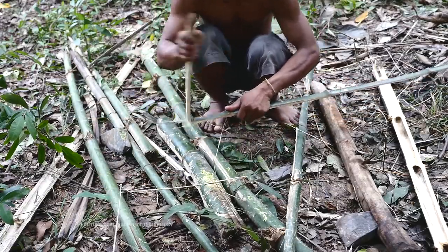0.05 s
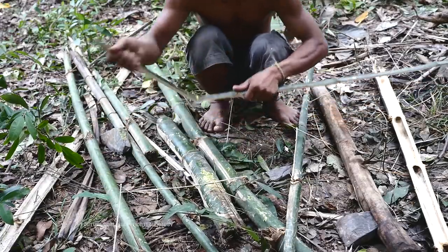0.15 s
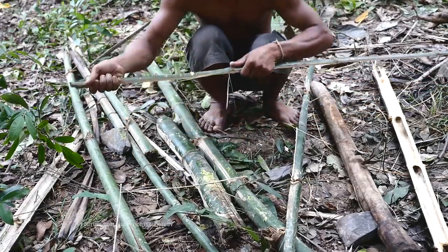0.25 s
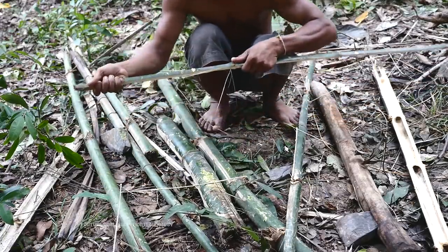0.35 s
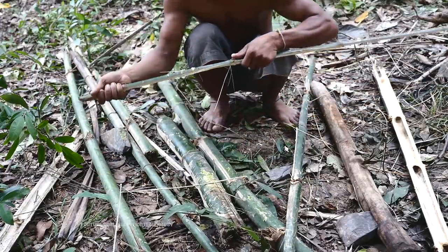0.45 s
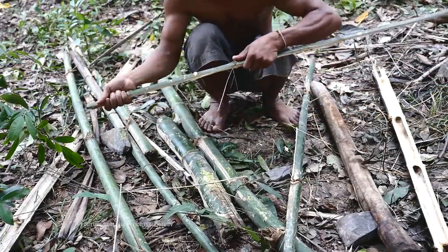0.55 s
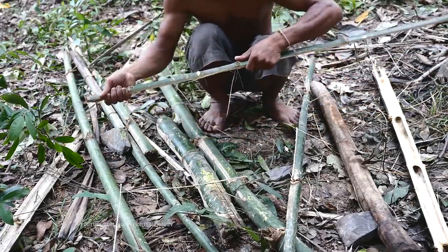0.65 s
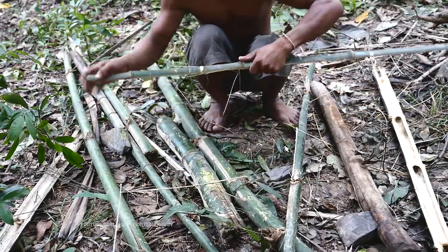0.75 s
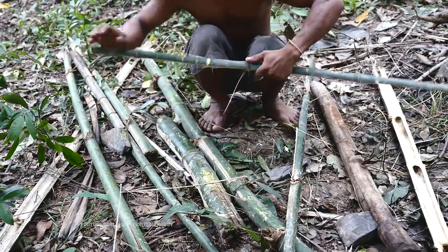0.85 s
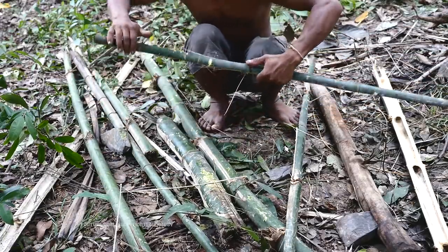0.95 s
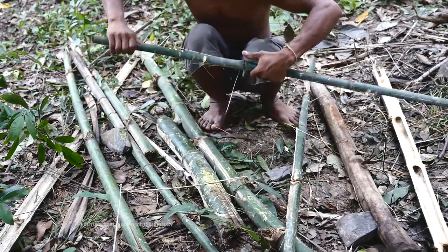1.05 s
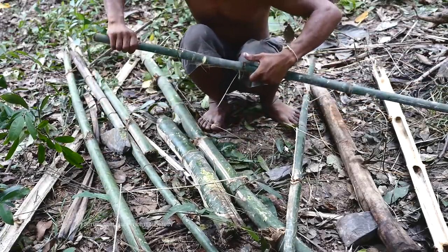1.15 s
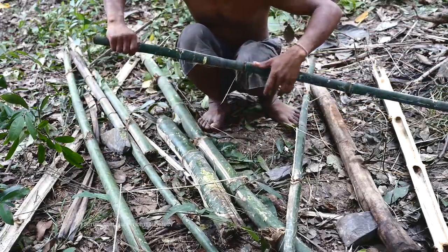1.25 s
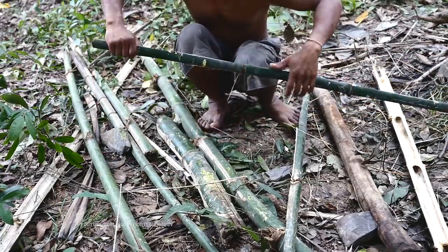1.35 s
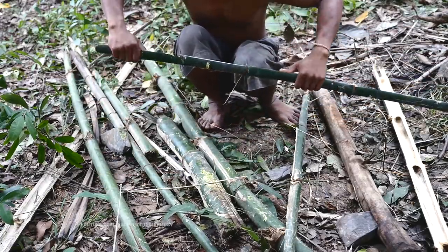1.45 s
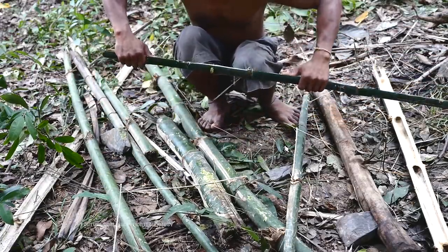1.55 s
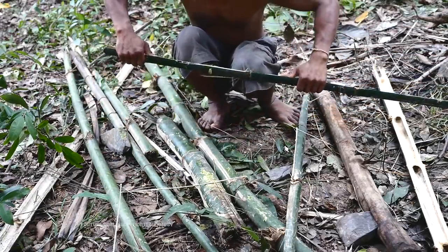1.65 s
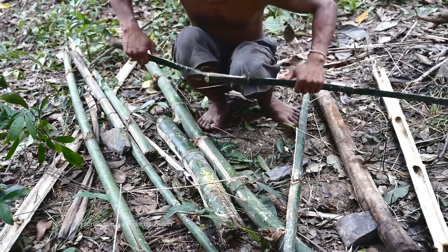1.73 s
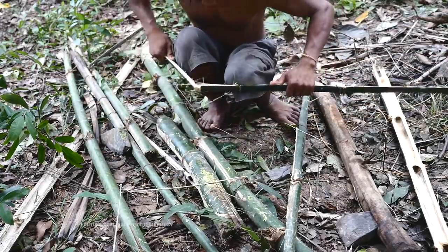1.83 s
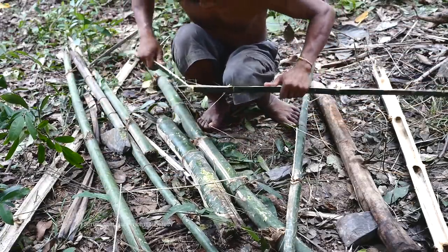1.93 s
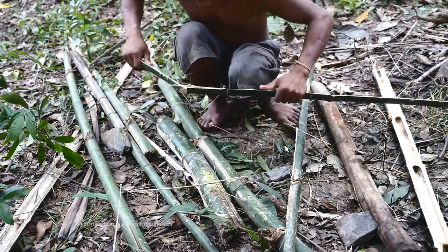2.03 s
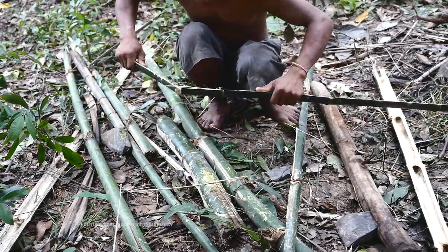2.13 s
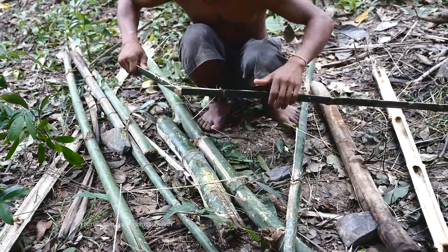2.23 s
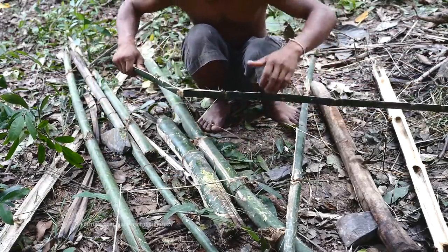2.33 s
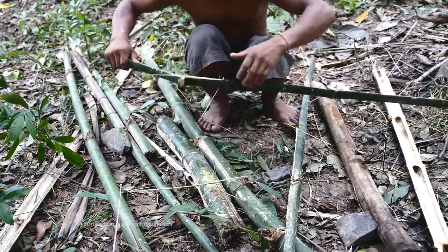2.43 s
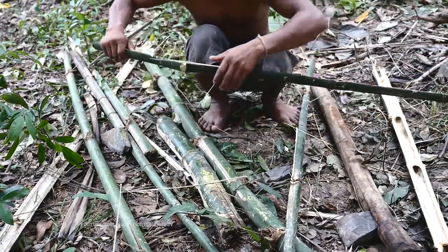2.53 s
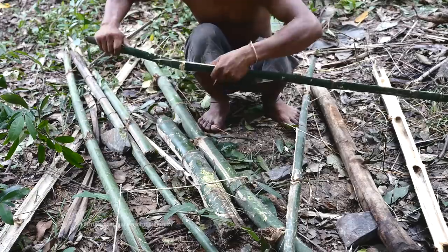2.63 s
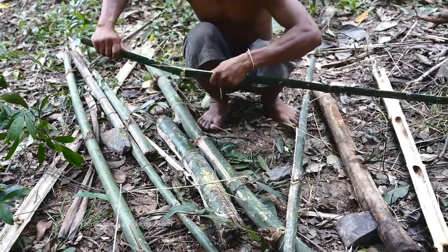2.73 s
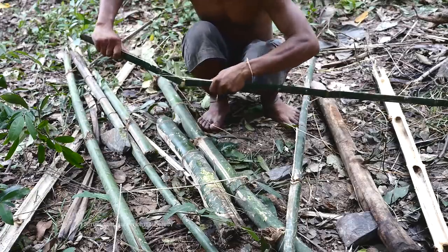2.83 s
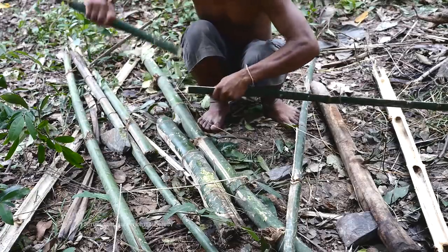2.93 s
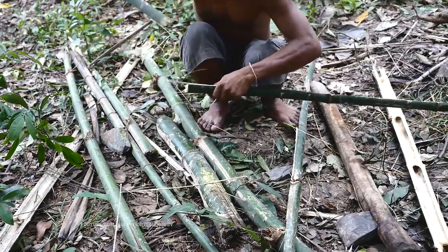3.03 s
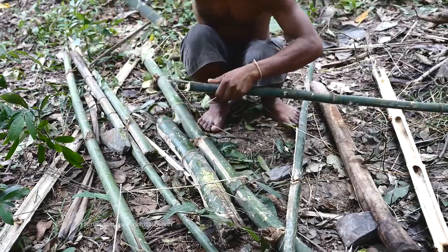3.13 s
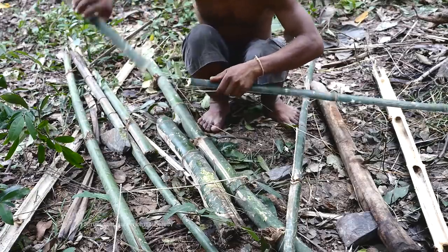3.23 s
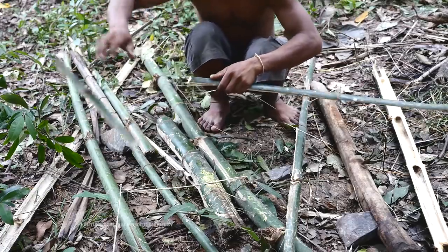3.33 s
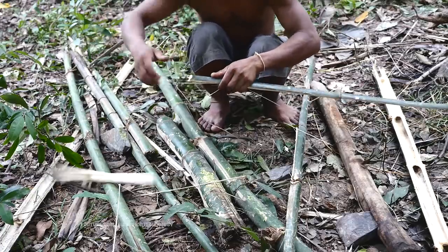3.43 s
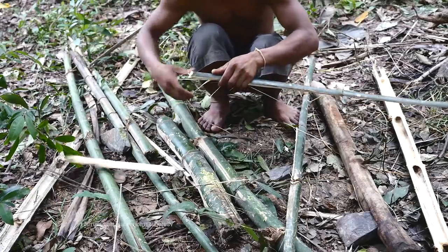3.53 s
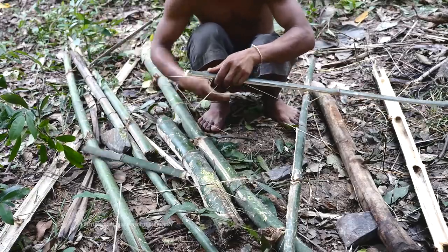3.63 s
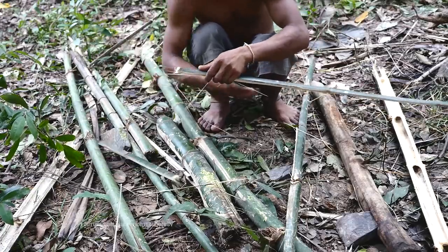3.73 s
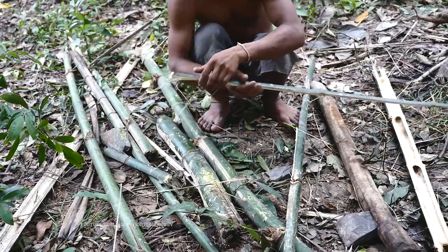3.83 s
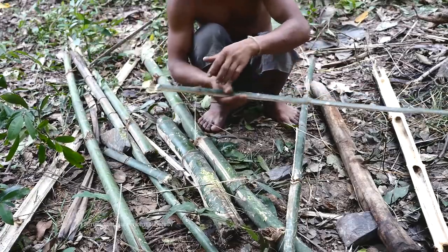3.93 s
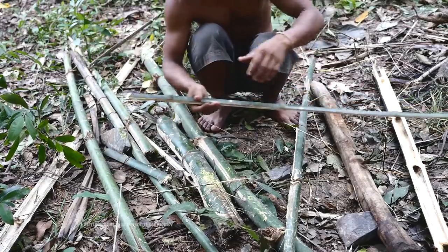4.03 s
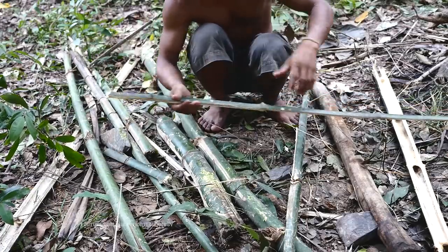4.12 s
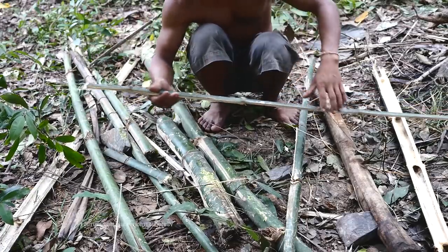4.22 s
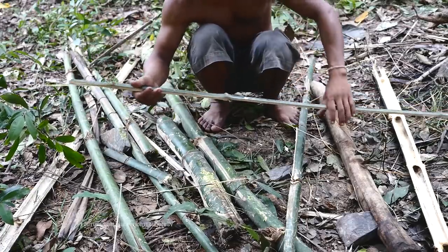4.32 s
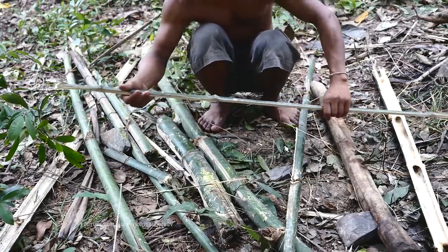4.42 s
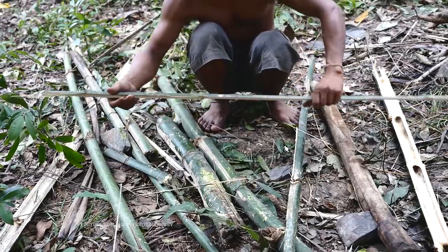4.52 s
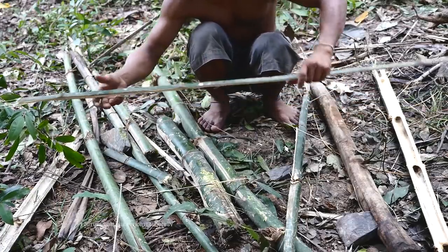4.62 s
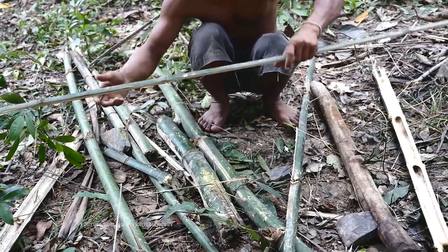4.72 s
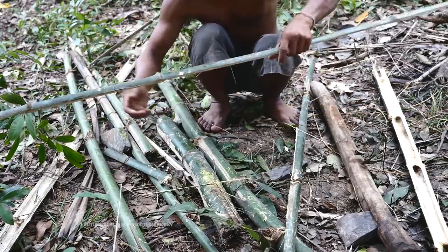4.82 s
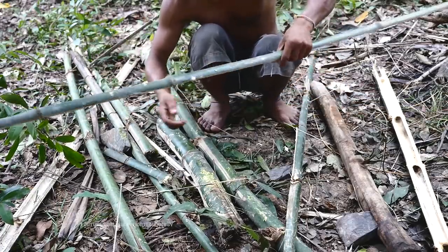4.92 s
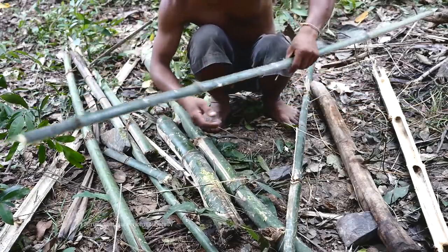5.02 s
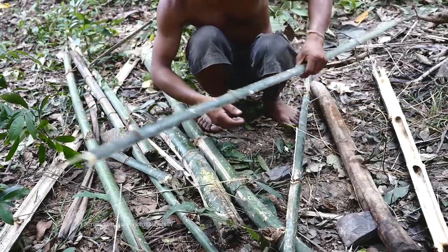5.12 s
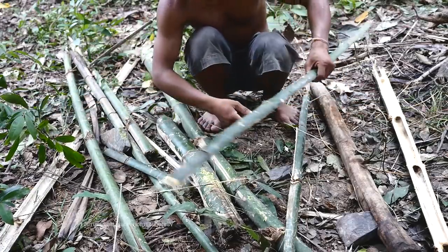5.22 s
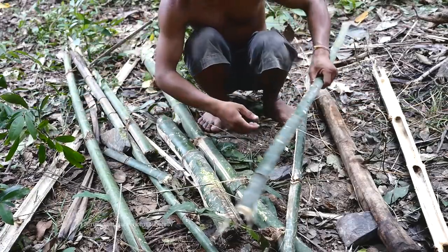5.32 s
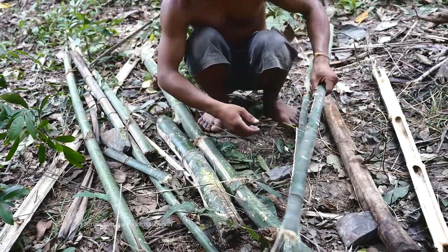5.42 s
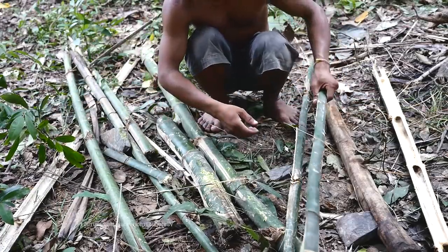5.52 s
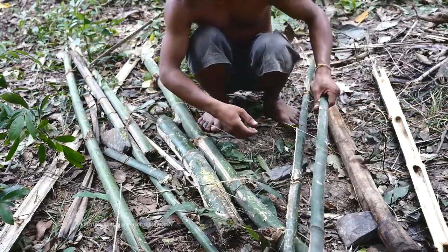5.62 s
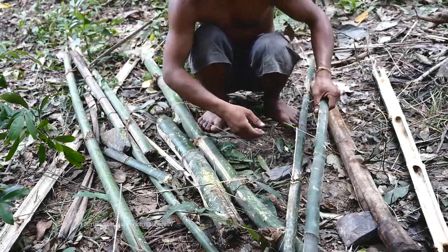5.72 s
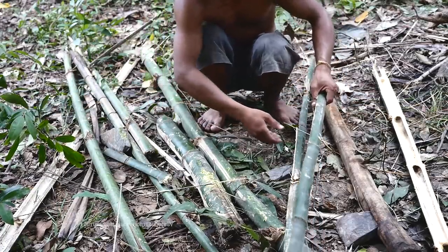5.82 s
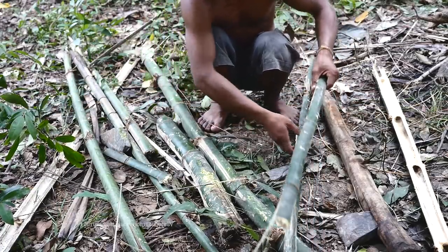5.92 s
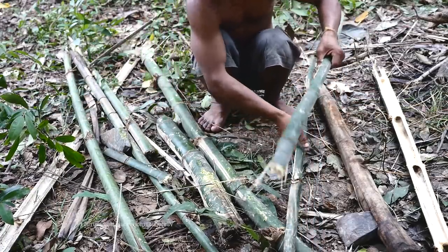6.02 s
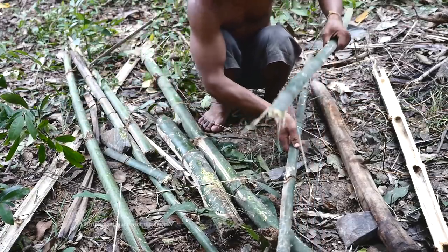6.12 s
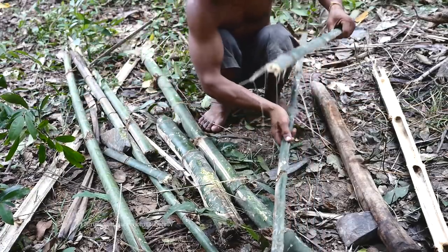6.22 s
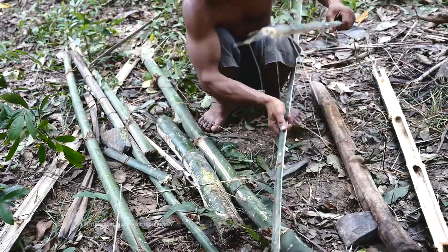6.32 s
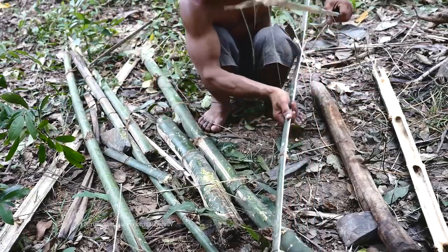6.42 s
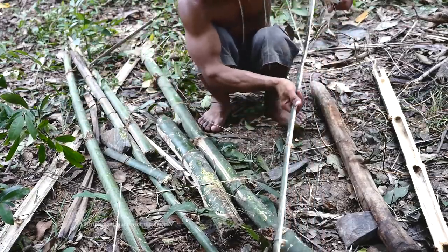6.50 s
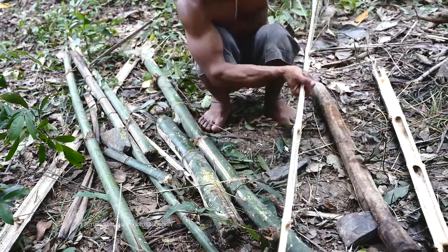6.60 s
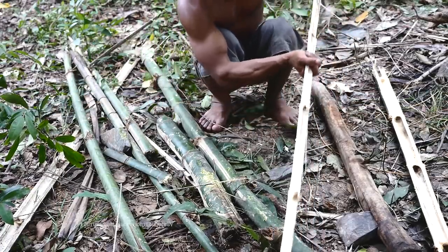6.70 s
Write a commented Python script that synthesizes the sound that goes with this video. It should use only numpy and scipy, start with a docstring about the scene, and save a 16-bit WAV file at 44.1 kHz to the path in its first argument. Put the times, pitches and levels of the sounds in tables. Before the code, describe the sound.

Bamboo is worked by hand close to the microphone, fairly dry, in a quiet forest. A light knock and crack open the sound, followed by small ticks and a soft thump with a click at about 1 second. Around 1.7 seconds fibres snap in a sharp volley and tear briefly until 2.2. A second run of cracks builds from 2.7 to 2.9 seconds. At 3.5 the broken piece hits a pile of hollow poles, the loudest moment, knocking, bouncing and scattering dry leaves until about 3.9. Palms slide softly along the bamboo from 4 to 4.5 seconds. After a lull, faint scuffs and ticks return from about 6 seconds to the end, near 6.8. Far birds give short, mostly falling whistles near 0.4, 1.5 and from 5 to 6.5 seconds. A cricket trills faintly once near 1.2. Thin insect hiss, low rumble and a faint hum continue throughout.

```python
"""A green bamboo pole is bent and broken by hand: fibres snap in volleys and tear, palms slide on its skin.
The broken piece is thrown onto a pile of hollow poles, where it knocks, bounces and scatters dry leaves.
Snaps and rubbing are a crackle of tiny breaks; each knock is a click that rings an air column and a wall.
In the forest around, far birds whistle, mostly in down-slurs, a cricket trills once and insects hiss
near 10 kHz, with a low rumble and a faint hum under it all."""
import sys
import numpy as np
from scipy import signal
from scipy.fft import rfft, irfft, next_fast_len
from scipy.io import wavfile
from scipy.ndimage import uniform_filter1d, map_coordinates

SR = 44100
rng = np.random.default_rng(int(sys.argv[2]) if len(sys.argv) > 2 else 0)


def master_out(mix):
    """Clip the mix to full scale and print it as 16-bit PCM to the path in sys.argv[1]."""
    frames = np.transpose(np.atleast_2d(mix))
    ceiling = np.clip(frames, -1, 1)
    pcm = np.round(ceiling * 32767).astype(np.int16)
    wavfile.write(sys.argv[1], SR, pcm)


N = 298116


def amp(db):
    return 10 ** (np.asarray(db) / 20)


def unit(x):
    return x / np.sqrt(np.mean(x ** 2) + 1e-20)


def along(points, hz):
    """Read a curve of (Hz, value) points on a log frequency axis."""
    f, v = np.transpose(points)
    return np.interp(np.log(hz + 1), np.log(f + 1), v)


def wobble(rate):
    """Smooth random modulation, rate knots a second."""
    return map_coordinates(rng.standard_normal(int(N * rate / SR) + 4), [np.arange(N) * rate / SR])


def filtered(x, response):
    """EQ x with a gain given as a function of Hz."""
    size = next_fast_len(x.shape[-1] + 8192)
    return irfft(rfft(x, size) * response(np.fft.rfftfreq(size, 1 / SR)), size)[..., :x.shape[-1]]


def low_cut(x, low_hz):
    """Cut the deep bass below low_hz with a steep slope."""
    return filtered(x, lambda hz: 1 / np.sqrt(1 + (low_hz / (hz + 1)) ** 6))


def add(bus, start, sound, pan_db=0):
    """Lay a sound into the stereo bus at start seconds; positive pan is left."""
    part = bus[:, max(round(start * SR), 0):][:, :sound.shape[-1]]
    part += (sound * amp([[pan_db / 2], [-pan_db / 2]]))[:, :part.shape[1]]


def crackle(n, alike, spiky_db):
    """Stereo noise made of tiny breaks of uneven size, partly shared by both sides."""
    a, b = rng.standard_normal((2, n)) * amp(spiky_db * rng.standard_normal(n // 24 + 1).repeat(24)[:n])
    turn = np.arccos(np.clip(alike, 0, 1)) / 2
    mid, side = np.cos(turn) * a, np.sin(turn) * b
    return np.array([mid + side, mid - side])


# Tone of breaking fibre: f/Hz, level/dB
FIBRE_EQ = [(180, -15.5), (300, -17.5), (449, -4), (587, -14.5), (907, -6), (1000, -8.5), (1290, -6.5),
            (1720, -7.5), (2610, -2.5), (6670, -4), (8020, -3.5), (11400, -2), (15200, -13), (16500, -30.5)]

def fibre(tilt_db, body_db=0, bumpy_db=0):
    """One fibre's EQ: a tilt per octave about 6 kHz, the pole's body under 2 kHz, random resonances."""
    bumps_db = bumpy_db * rng.standard_normal(16)

    def response(hz):
        tilt = tilt_db * np.log2((hz + 50) / 6000)
        body = body_db / (1 + (hz / 2000) ** 6)
        resonances = np.interp(hz, np.geomspace(800, 16000, 16), bumps_db)
        return amp(along(FIBRE_EQ, hz) + tilt + body + resonances)
    return response


def ticks(count):
    """Single fibres and leaf edges: one-cycle ticks, a few louder than the rest."""
    when, pitch, size, side = rng.random((count, 4)).T
    t = np.arange(32) / SR
    hz = 4500 * 3 ** pitch[:, None]
    rings = amp(-4 * np.log(size + .005))[:, None] * np.sin(2 * np.pi * hz * t) * np.exp(-t * hz)
    where = (when * (N - 32)).astype(int)[:, None] + np.arange(32)
    return unit(np.array([np.bincount(where.ravel(), (rings * gain[:, None]).ravel(), N)
                          for gain in (0.23 + side, 1.3 - side)]))


# Fader ride of the tearing, sliding and rustling: t/s, level/dB
RUB_RIDE = [(0, -51.5), (.52, -70.5), (1.13, -62), (1.5, -64), (1.75, -59.5), (1.9, -38), (2.02, -47.5),
            (2.18, -52), (2.4, -64), (2.86, -56), (3.3, -58.5), (3.5, -69), (3.67, -54.5), (3.96, -55),
            (4.06, -46), (4.3, -44.5), (4.56, -58), (4.7, -67.5), (5.87, -67), (6.42, -54), (6.76, -62)]

def rubbing():
    """Tearing and sliding: crackle that crossfades from dull to bright with effort, ticks on top."""
    db = np.interp(np.arange(N) / SR, *np.transpose(RUB_RIDE))
    dull, bright = (unit(filtered(crackle(N, alike=.7, spiky_db=2), fibre(tilt))) for tilt in (-4, 4))
    tilt_db = 2.45 + 0.096 * (db + 55)
    blend = np.clip(.5 + tilt_db / 8, 0, 1)
    hiss = np.sqrt(1 - blend) * dull + np.sqrt(blend) * bright
    level = amp(db + wobble(40) + .5 * wobble(12))
    return level * (hiss + amp(-11) * ticks(count=4000))


# Tone of the forest bed: f/Hz, level/dB
FOREST_EQ = [(15, -63), (25, -19), (154, -0.5), (192, -4), (226, -5.5), (445, -12.5), (524, -15),
             (584, -10.5), (634, -9.5), (706, -11.5), (1390, -14), (4480, -22), (10400, -28), (15200, -101),
             (16500, -66)]
# Its stereo image: f/Hz, left-right correlation
FOREST_IMAGE = [(60, 0.9), (180, 1), (550, 0.16), (1650, -0.66), (4970, -0.054), (15000, -1.4)]

def forest():
    """Patchy far noise with a rumble, near mono in the bass."""
    spectrum = signal.stft(rng.standard_normal((2, N)), nperseg=512)[2]
    patches = uniform_filter1d(uniform_filter1d(rng.standard_normal(spectrum.shape[1:]), 6, 0), 14, 1)
    noise = signal.istft(spectrum * amp(0.97 * unit(patches)), nperseg=512)[1][:, :N]
    turn = lambda hz: np.arccos(np.clip(along(FOREST_IMAGE, hz), -1, 1)) / 2
    mid, side = filtered(noise, lambda hz: amp(along(FOREST_EQ, hz)) * [np.cos(turn(hz)), np.sin(turn(hz))])
    return amp(-58.5) * unit(np.array([mid + side, mid - side]))


# Partials of the hum: f/Hz, level/dB
HUM_PARTIALS = [(120, -76), (166, -72.5), (360, -73), (480, -79), (540, -76), (660, -75), (786, -85)]

def hum():
    """A faint drone whose partials each drift in level and phase."""
    t = np.arange(N) / SR
    return sum(amp(db + 2 + 1.7 * wobble(1.6)) * np.sin(2 * np.pi * hz * t + 0.85 * wobble(11))
               for hz, db in HUM_PARTIALS)


# Band of the insect chorus: f/Hz, level/dB
INSECT_EQ = [(8600, -32.5), (9500, 0), (10200, 6.5), (11000, -9.5), (12000, -27)]

def insects():
    """Many far insects merge into a wavering band of hiss."""
    hiss = filtered(rng.standard_normal((2, N)), lambda hz: amp(along(INSECT_EQ, hz)))
    return amp(-73.5 + 0.67 * wobble(0.68) + 1.3 * wobble(15)) * unit(hiss + 0.82 * hiss[::-1])


# Resonances of the bamboo shell: f/Hz, width/Hz, level/dB
SHELL_MODES = [(2170, 520, -8.5), (3900, 1800, -19.5), (1560, 690, -17.5)]

def shell(hz):
    """The shell colours a click with broad resonances of alternating polarity."""
    return sum((-1) ** k * amp(db) * 1j * hz * width / (centre ** 2 - hz ** 2 + 1j * hz * width)
               for k, (centre, width, db) in enumerate(SHELL_MODES))


# Pole-on-pole hits: t/s, click level/dB, air column level/dB, wall level/dB, wall f/Hz
POLE_HITS = [(.0075, -41, -66, -34, 1890), (.0095, -37, -66, -26.5, 3535), (.174, -60, -65, -36.5, 3280),
             (0.9524, -32, -60, -33, 1090), (.9585, -42, -67, -35, 3980), (1.5608, -33.5, -56, -49, 1510),
             (2.8988, -14.5, -56, -26.5, 986), (2.9133, -21, -56, -28, 1008), (3.4761, -6, -24, -14, 1510),
             (3.4821, -3.5, -8, -11, 1160), (3.4984, -8.5, -11.5, -17.5, 1274),
             (3.5145, -14, -31, -16, 852), (3.522, -11.5, -41, -17, 1860),
             (3.6332, -14, -14.5, -23.5, 1240), (3.639, -55, -61, -44, 1000), (3.645, -17, -46, -23.5, 886),
             (3.65, -38, -34, -21.5, 1107), (3.681, -50, -54, -31, 950), (3.7245, -32, -49, -45, 1370),
             (3.739, -50, -44.5, -37, 1230), (3.8402, -45.5, -47.5, -52, 1310),
             (3.8786, -36.5, -53, -42, 1404)]

def knocks(air_hz=681, air_t60_s=0.064, wall_t60_s=0.04):
    """A click in the shell, then the air column and the struck wall ring; the next contact chokes them."""
    bus, t = np.zeros((2, N)), np.arange(SR // 6) / SR
    lag = np.array([[0], [.00008]])  # the pile lies to the left, so the right side hears it later
    contact = np.exp(-((t - .0008 - lag) / .00006) ** 2)  # a soft contact keeps the click dull
    click = filtered(contact, shell)
    click /= np.abs(click).max()
    age = np.maximum(t - .001 - lag, 0)
    ends = [hit[0] for hit in POLE_HITS[1:]] + [N / SR]
    for (start, click_db, air_db, wall_db, wall_hz), end in zip(POLE_HITS, ends):
        gate = (1 - np.exp(-age / 0.0012)) * np.exp(-np.maximum(t - end + start, 0) / 0.0031)
        wander = 0.16 * np.cumsum(rng.standard_normal(len(t)))  # split wood blurs the pitch
        air = amp(air_db - 60 * age / air_t60_s) * np.sin(2 * np.pi * air_hz * age)
        wall = amp(wall_db - 60 * age / wall_t60_s) * np.sin(2 * np.pi * wall_hz * age + wander)
        add(bus, start, -amp(click_db) * click, pan_db=3)
        add(bus, start, gate * air, pan_db=2.5)
        add(bus, start, gate * wall, pan_db=5)
    return low_cut(bus, low_hz=250)


# Snaps of fibres and leaves: t/s, level/dB, tilt/(dB per octave), t60/s, pan/dB
SNAP_CUES = [(.0084, -34, -1, 0.071, -2), (0.0298, -47, 0, 0.069, -.5), (0.0774, -45, 6, .045, 0),
             (0.175, -43, -1.5, 0.058, -1.5), (.2195, -55, 4, .04, 0), (.367, -54.5, 17, .03, 5),
             (.4663, -47, 2, 0.081, 1), (.683, -57.5, 5, .06, 0), (0.951, -34.5, 1.5, 0.2, -2.5),
             (1.562, -50.5, -4, 0.11, 0), (1.727, -26, 3.5, 0.12, -2.5), (1.734, -37, 6.5, .062, 3),
             (1.7406, -33.5, 5, 0.19, 6), (1.7688, -30, 0, 0.12, 0.5), (1.7738, -15, 6, 0.1, 2),
             (1.7953, -28, 3.5, .063, -1), (2.188, -50, -2, 0.059, -24), (2.6755, -42.5, 5.5, .073, -6),
             (2.6818, -42.5, 5, 0.081, 4), (2.8101, -46.5, -3, 0.1, 8), (2.817, -24.5, 15.5, .098, 0),
             (2.8414, -30, 4.5, .07, -3), (2.862, -22, 16, 0.033, 2), (2.8648, -27, 1, 0.063, 0),
             (2.8732, -24, 5, 0.12, 0), (2.8962, -23, 2.5, 0.18, 0.5), (2.9122, -20, 0, 0.037, -1.5),
             (3.4772, -26.5, 2.5, 0.14, 1), (3.5073, -38, -9, 0.16, 3.5), (3.5154, -25, -2.5, 0.092, 7),
             (3.5227, -27, 7, 0.067, -1), (3.548, -33, 1, 0.049, 4), (3.6439, -30.5, -5, .059, -1),
             (3.687, -42.5, 5, .15, 0), (3.723, -44.5, 3, 0.069, 1), (3.8392, -40.5, -4, 0.051, 4.5),
             (3.878, -47.5, -8, .185, -3), (4.3012, -47.5, -3.5, 0.15, -18.5),
             (5.2834, -58.5, 7, 0.074, -11.5), (5.824, -62.5, -6, .05, -3), (6.095, -58, 9, 0.087, -6),
             (6.138, -55, -5, 0.24, -6), (6.2307, -51, -0.5, 0.22, -3.5), (6.2515, -49, 2.5, 0.28, 3),
             (6.3732, -48, -4, 0.049, -2), (6.654, -52.5, -5, .051, 0)]

def snaps(crack_boost_db=3, crack_t60_s=0.0094):
    """A broadband crack, then a tail of smaller fibres letting go ever more faintly."""
    bus, t = np.zeros((2, N)), np.arange(SR // 3) / SR
    crack_t = t[:SR // 50]
    crack_db = crack_boost_db - 60 * np.maximum(crack_t - .001, 0) / crack_t60_s
    attack = 1 - np.exp(-t / 0.00094)
    for start, db, tilt_db, t60, pan_db in SNAP_CUES:
        body_db = -3.5 + 0.26 * (db + 30)  # strong snaps shake the pole's body more
        crack, tail = (unit(filtered(crackle(n, 0.78, spiky_db=3.5), fibre(tilt, body_db, bumpy_db=2.5)))
                       for n, tilt in ((len(crack_t), 0.84 * tilt_db), (len(t), tilt_db)))
        add(bus, start + 0.00041, amp(db + crack_db) * crack, pan_db)
        add(bus, start + .0005, amp(db - 60 * t / t60) * attack * tail, pan_db)
    return bus


# Bird whistles: t/s, length/s, start f/Hz, end f/Hz, level/dB, pan/dB
WHISTLE_CUES = [(0.354, 0.068, 4840, 2890, -61.5, 4.5), (0.39, 0.037, 4770, 4310, -62, 2),
                (1.487, 0.066, 4650, 3120, -65.5, 4), (5.106, 0.063, 4750, 2960, -64, 0),
                (5.202, 0.22, 4594, 4510, -79, -4), (5.496, 0.025, 3860, 4830, -64, 5),
                (5.528, 0.088, 4340, 3340, -72, -2), (5.868, 0.045, 3660, 2660, -69, 4),
                (5.869, .05, 1960, 1720, -76, 6), (5.888, 0.038, 2850, 2610, -81, 0),
                (6.532, .05, 4475, 3900, -66.5, 0)]

def birds(fade_db=4):
    """Far whistles: sine glides that fade a little as they go."""
    bus = np.zeros((2, N))
    for start, length, start_hz, end_hz, db, pan_db in WHISTLE_CUES:
        progress = np.linspace(0, 1, round(length * SR))
        hz = end_hz + (start_hz - end_hz) * (1 - progress) ** 0.95
        blur = .08 * np.cumsum(rng.standard_normal(len(hz)))  # leaves blur the far tone
        envelope = amp(db - fade_db * progress) * np.sin(np.pi * progress) ** 0.11
        add(bus, start, envelope * np.sin(2 * np.pi * np.cumsum(hz) / SR + blur), pan_db)
    return bus


# Scuffs and rips: peak t/s, level/dB, half length/s, tilt/(dB per octave), pan/dB
SCUFF_CUES = [(0.737, -51, 0.018, -1, 2), (1.151, -54.5, 0.033, -0.5, -4), (1.65, -53.5, 0.033, 0.5, -4),
              (1.778, -24.5, 0.0078, 3, -13), (1.863, -37.5, 0.018, -1, -5),
              (1.907, -42, 0.026, -2.5, -14.5), (1.951, -41.5, .012, -3, -11),
              (2.116, -39.5, 0.021, 0.5, -6.5), (2.196, -46, 0.021, 4.5, 5), (2.68, -46.5, .01, -1.5, -4),
              (3.561, -32, .013, 2, 1), (3.913, -47, 0.023, 0, 1.5), (4.004, -41, 0.011, 4, -4),
              (4.088, -47, 0.03, -1.5, -7), (4.16, -45, .025, 0.5, -10), (4.249, -44, .027, 1, -10),
              (4.344, -41.5, 0.015, 1, -6), (4.42, -48, 0.015, 0.5, -6), (5.001, -58, .012, -5, -3),
              (5.55, -60.5, .06, -3.5, 3), (5.9, -59.5, 0.034, -4.5, 4), (6.027, -63, 0.024, -5, 2),
              (6.261, -52, 0.037, -4.5, -4), (6.318, -52, 0.025, -1.5, -4), (6.412, -52, 0.013, 2, -3),
              (6.522, -49.5, 0.035, -1, -2), (6.578, -52, 0.023, -1, -2), (6.653, -52.5, 0.013, 1, -2),
              (6.75, -54.5, 0.013, 0, -1)]

def scuffs():
    """Short strokes of skin, fibre and leaves: crackle under a bell-shaped swell."""
    bus = np.zeros((2, N))
    for peak, db, half, tilt_db, pan_db in SCUFF_CUES:
        reach = round(3 * half * SR)
        t = np.arange(-reach, reach) / SR
        colour = fibre(tilt_db, body_db=-1, bumpy_db=2.5)
        texture = unit(filtered(crackle(len(t), alike=0.14, spiky_db=1), colour))
        add(bus, peak + t[0], amp(db) * texture * np.exp(-(t / half) ** 2), pan_db)
    return bus


# Soft low hits: t/s, level/dB, f/Hz
THUD_CUES = [(.957, -40, 174), (.985, -45.5, 139), (1.565, -53, 296), (1.94, -39, 280), (1.946, -41.5, 492),
             (2.917, -45.5, 354), (3.484, -28, 400), (3.501, -22.5, 485), (3.525, -29, 165.4),
             (3.69, -42.5, 228), (6.42, -52.5, 582), (6.655, -53.5, 488)]

def thuds(t60_s=0.095):
    """The pole lands on a hand or the ground: a low push with a puff of dull noise."""
    bus, t = np.zeros((2, N)), np.arange(SR // 5) / SR
    for start, db, hz in THUD_CUES:
        puff = unit(filtered(rng.standard_normal(len(t)), lambda f: f ** 2 / (1 + (f / (1.47 * hz)) ** 4)))
        envelope = amp(db - 60 * t / t60_s) * (1 - np.exp(-t / 0.0028))
        add(bus, start - .004, envelope * (np.sin(2 * np.pi * hz * t) + 0.92 * puff))
    return low_cut(bus, low_hz=110)


# The trill: start t/s, end t/s, f/Hz, pulse rate/Hz, level/dB
TRILL_CUE = (1.16, 1.28, 9750, 42, -64)

def cricket():
    """One short trill: a high tone, pulsed and roughened."""
    bus = np.zeros((2, N))
    start, end, hz, rate, db = TRILL_CUE
    t = np.arange(round((end - start) * SR)) / SR
    pulses = np.sin(np.pi * rate * t) ** 2
    rasp = .5 + rng.standard_normal(len(t) // 60 + 1).repeat(60)[:len(t)]
    add(bus, start, amp(db) * pulses * rasp * np.sin(2 * np.pi * hz * t))
    return bus


# Reverb decay among the trees: f/Hz, t60/s
TREE_DECAY = [(200, 0.32), (2000, 0.43), (8000, 0.44), (15000, 0.044)]

def tree_echoes(send):
    """Scattered echoes from trunks; each frequency dies at its own speed."""
    hz, t, spectrum = signal.stft(rng.standard_normal((2, SR // 2)), SR, nperseg=256)
    decay = amp(-60 * t / along(TREE_DECAY, hz)[:, None])
    tail = signal.istft(spectrum * decay, SR, nperseg=256)[1]
    return signal.fftconvolve(send, tail / np.linalg.norm(tail[0]), axes=1)[:, :N]


def narrow_bass(x):
    """Two microphone ports close together: long waves reach both alike."""
    mid, side = (x[0] + x[1]) / 2, (x[0] - x[1]) / 2
    side = filtered(side, lambda hz: 1 / np.sqrt(1 + (700 / (hz + 1)) ** 2))
    return np.array([mid + side, mid - side])


def scene():
    """Bamboo close and fairly dry, birds and cricket deep in the reverb, over the forest bed."""
    near = low_cut(snaps() + scuffs(), low_hz=150) + thuds()
    pile = knocks()
    far = birds() + cricket()
    echoes = tree_echoes(amp(-11) * near + amp(-30) * pile + amp(8.5) * far)
    return narrow_bass(near + pile + rubbing() + .5 * far + echoes) + forest() + hum() + insects()


def record(dry):
    """Rounds off peaks, cuts deep bass, softens a narrow band near 8 kHz and fades out the top treble."""
    rounded = dry / (1 + np.abs(dry / .95) ** 4) ** .25
    bass_cut = lambda hz: 1 / np.sqrt(1 + (55 / (hz + 1)) ** 4)
    dip = lambda hz: amp(-4 * np.exp(-((hz - 7900) / 450) ** 2))
    top_cut = lambda hz: np.clip((16700 - hz) / 1300, 0, 1) ** 2
    return filtered(rounded, lambda hz: bass_cut(hz) * dip(hz) * top_cut(hz))


dry = scene()
out = record(dry)
master_out(out)
```